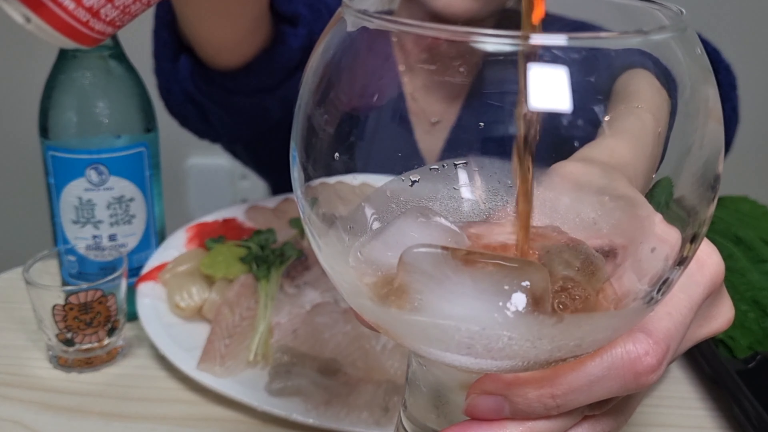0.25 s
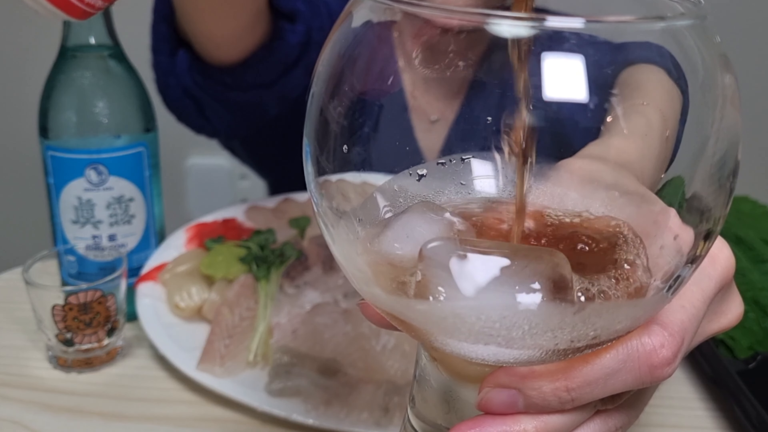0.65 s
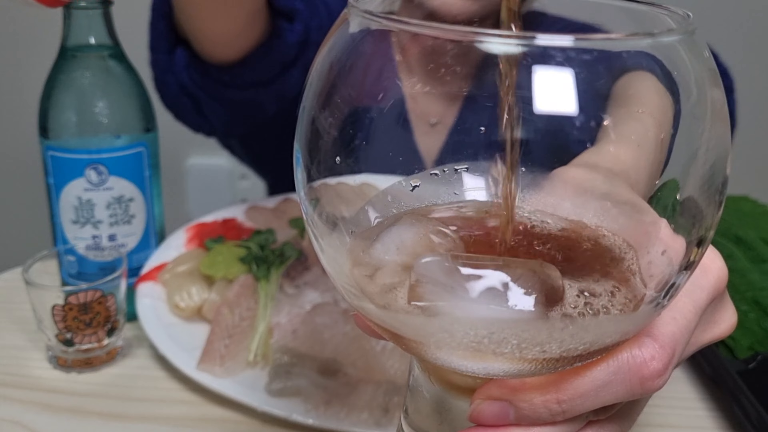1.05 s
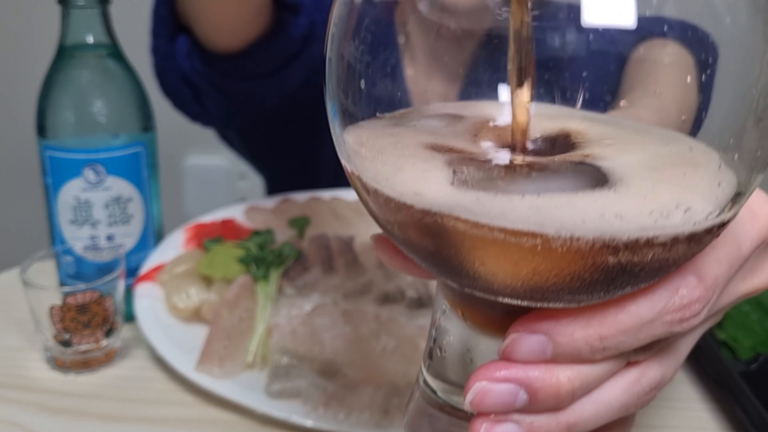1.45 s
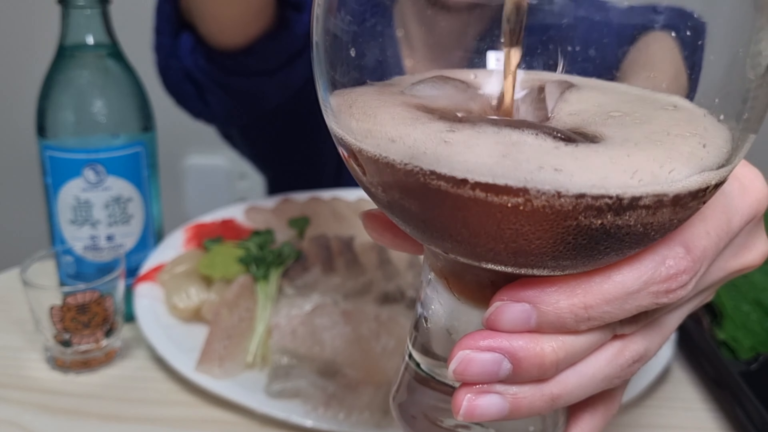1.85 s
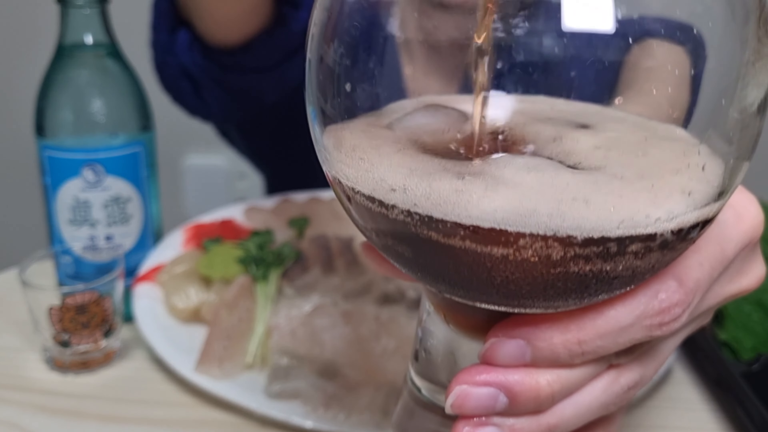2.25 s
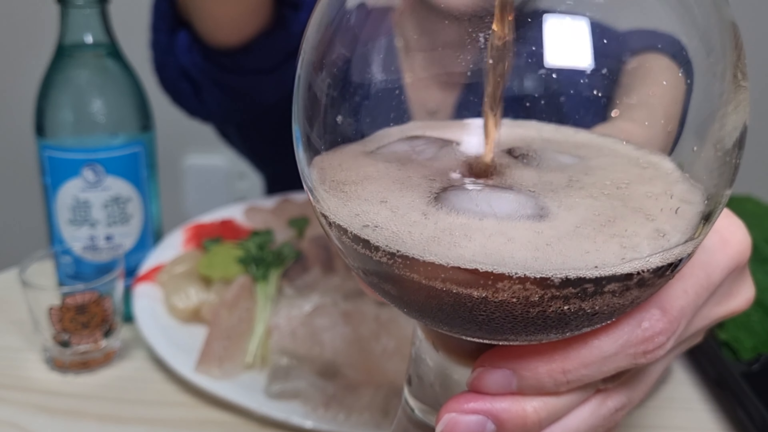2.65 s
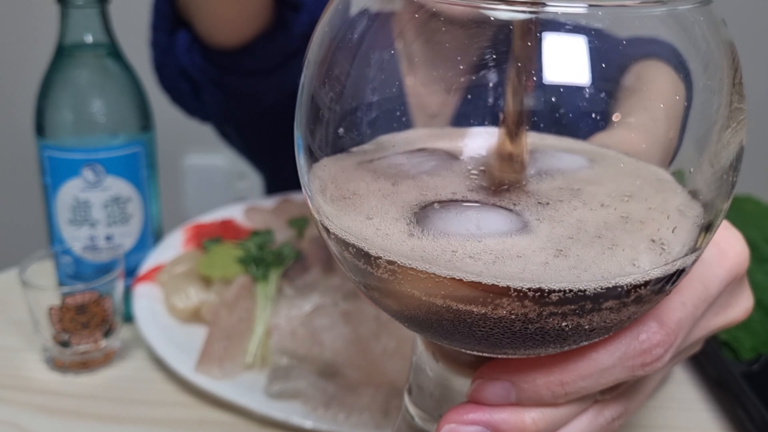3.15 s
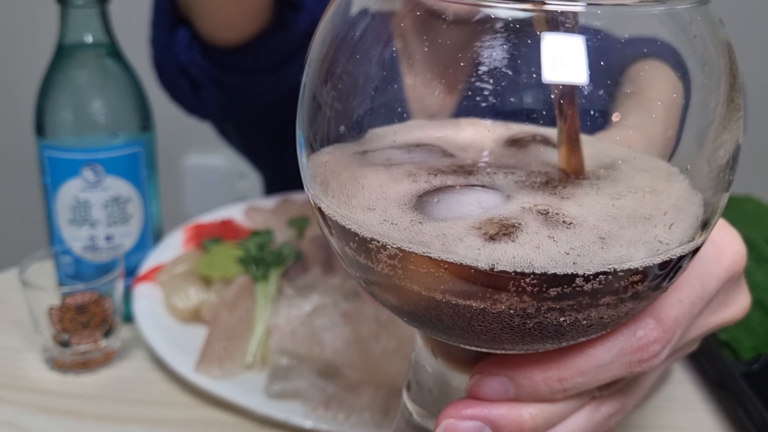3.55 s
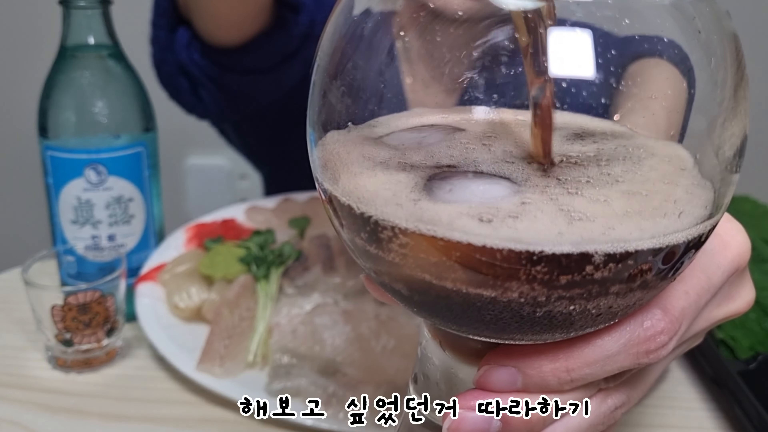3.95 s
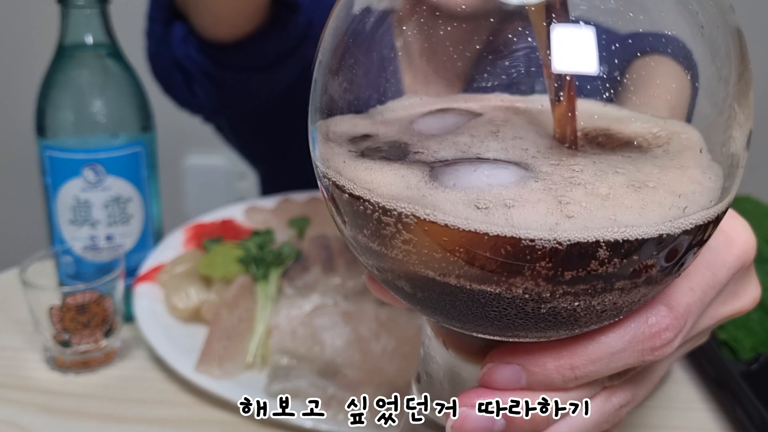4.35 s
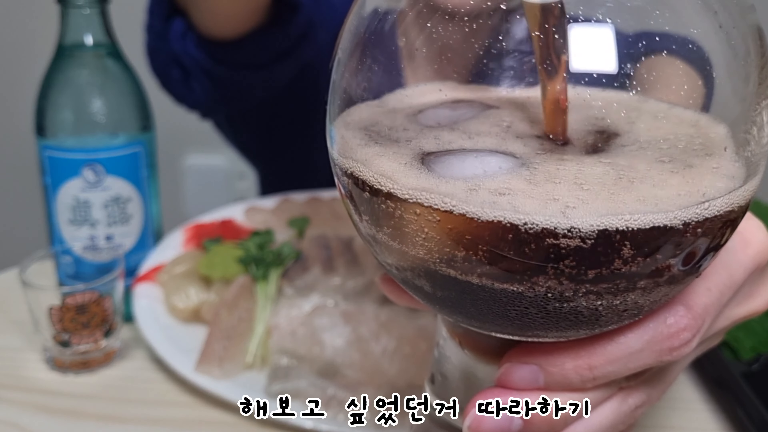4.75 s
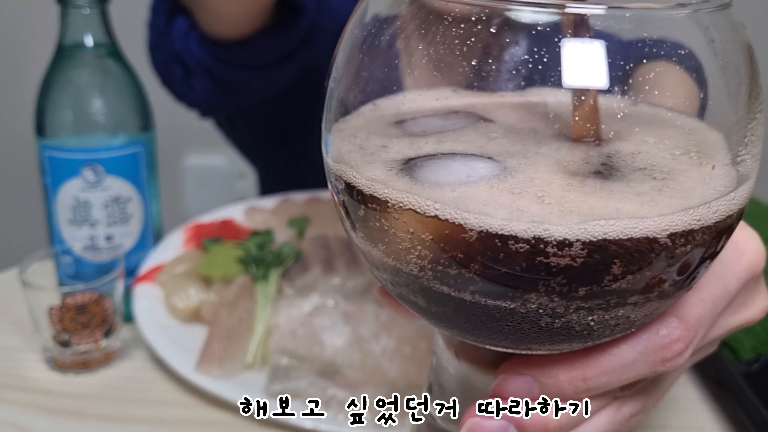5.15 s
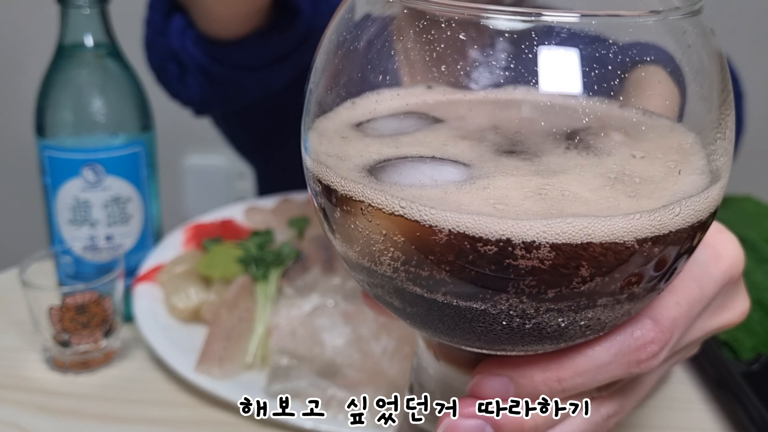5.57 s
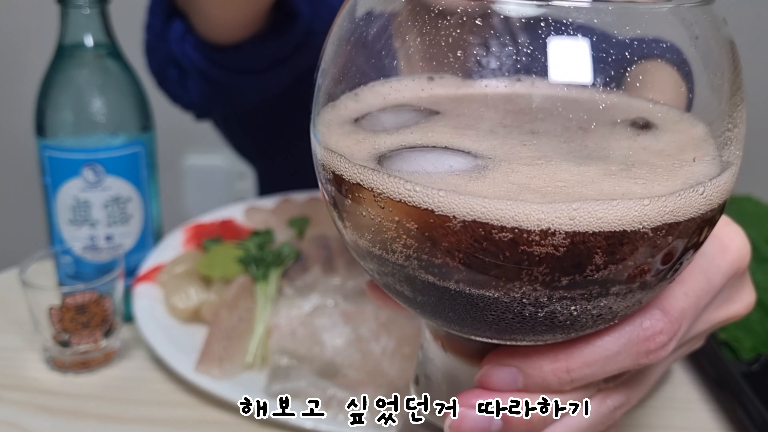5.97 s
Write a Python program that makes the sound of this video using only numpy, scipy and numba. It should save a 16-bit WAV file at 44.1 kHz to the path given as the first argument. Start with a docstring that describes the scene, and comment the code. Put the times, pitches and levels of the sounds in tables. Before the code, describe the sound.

Close, bright fizz and ice clinks as soda fills a big glass, with bubbling gulps, hard hollow knocks and a fading foam hiss.

```python
"""Cola is poured over ice in a big round glass, close to a stereo microphone in a quiet room.
First the stream spatters on bare ice, with fizz from swarms of tiny ringing bubbles; then the scene cuts
to a glass topped with foam, whose random pops hiss and set the air of the bowl singing.
Cubes knock as decaying tones with noise ticks, and the drink gurgles as gulps drive its moving resonances.
The pour ends and the foam fizzes on over a low hum and rumble; a limiter ducks the hardest knocks."""
import sys
import numpy as np
from scipy import signal
from scipy.fft import rfft, irfft
from scipy.io import wavfile
from scipy.ndimage import uniform_filter1d, minimum_filter1d
from numba import njit

SR = 44100
rng = np.random.default_rng(int(sys.argv[2]) if len(sys.argv) > 2 else 0)


def inscribe(sig):
    """Save sig as 16-bit PCM at rate SR to the path in sys.argv[1].

    A 1-D sig is mono; a 2-D sig holds one channel per row.
    Samples are clipped to [-1, 1] before scaling.
    """
    pcm = np.round(np.clip(np.atleast_2d(sig).T, -1, 1) * 32767)
    wavfile.write(sys.argv[1], SR, pcm.astype(np.int16))


N = 335907
TIME = np.arange(N) / SR  # s
FOAM_CUT_S, POUR_END_S = 1.335, 5.84  # the scene cuts from bare ice to a foamy glass; the pour ends


def from_db(db):
    """Decibels to gain."""
    return 10 ** (np.asarray(db) / 20)


def rms_one(x):
    """Scale to unit rms."""
    return x / np.sqrt(np.mean(x ** 2) + 1e-20)


def peak_one(x):
    """Scale to unit peak."""
    return x / (np.abs(x).max() + 1e-20)


def in_time(rows):
    """Columns of a curve table at every sample."""
    s, *columns = np.transpose(rows)
    return [np.interp(TIME, s, c) for c in columns]


def at_hz(points, hz):
    """Read a spectrum on a log-frequency axis."""
    f, db = np.transpose(points)
    return np.interp(np.log(hz + 1e-9), np.log(f), db)


def add(out, s, sound):
    """Mix a short sound in at time s."""
    i = max(int(s * SR), 0)
    out[..., i:i + sound.shape[-1]] += sound[..., :N - i]


def ramp(t, start, length):
    """Rise evenly from 0 to 1."""
    return np.clip((t - start) / length, 0, 1)


def swell(s, hold_s, db, rise_db_per_s, fall_db_per_s):
    """Level in dB that rises up to time s, holds and falls."""
    rise_db = rise_db_per_s * np.maximum(s - TIME, 0)
    fall_db = fall_db_per_s * np.maximum(TIME - s - hold_s, 0)
    return db - rise_db - fall_db


def drift(rate):
    """Smooth chance with spread 1, through `rate` random knots per second."""
    knots = rng.standard_normal(4096)
    return rms_one(np.interp(TIME * rate, np.arange(len(knots)), knots))


def resonate(x, hz, width):
    """Two-pole resonance with gain 1 on top."""
    r = np.exp(-np.pi * width / SR)
    numerator = np.array([1, 0, -1]) * (1 - r * r) / 2
    denominator = [1, -2 * r * np.cos(2 * np.pi * hz / SR), r * r]
    return signal.lfilter(numerator, denominator, x + 1e-18)


@njit
def glide(x, turn, keep):
    """Resonance whose pitch (radians per sample) moves."""
    out, state = np.zeros(len(x)), 0j
    for i in range(len(x)):
        state = state * keep * complex(np.cos(turn[i]), np.sin(turn[i])) + x[i]
        out[i] = state.real
    return out


def moving_mode(x, hz, width):
    """Drive a gliding resonance, twice over to keep its skirts narrow; rms 1."""
    turn = 2 * np.pi * hz / SR
    once = glide(x, turn, np.exp(-np.pi * width / SR))
    return rms_one(glide(once, turn, np.exp(-4 * np.pi * width / SR)))


def coloured(x, spectrum):
    """Shape steady sound by a spectrum that falls away below its first point; rms 1."""
    hz = np.fft.rfftfreq(N, 1 / SR)
    gain = from_db(at_hz(spectrum, hz)) * np.minimum(hz / spectrum[0][0], 1) ** 2
    return rms_one(irfft(rfft(x) * gain, N))


def pops(per_s, spread_db):
    """Random clicks, many small and a few large."""
    at = np.flatnonzero(rng.random(N) < per_s / SR)
    size_db = spread_db * np.minimum(rng.exponential(1, len(at)), 4)
    out = np.zeros(N)
    out[at] = from_db(size_db) * rng.choice([-1, 1], len(at))
    return out


def stereo(mid, side, likeness):
    """Two channels with the given correlation."""
    c = np.clip(likeness, -.99, .99)
    return (np.sqrt(1 + c) * mid + np.sqrt(1 - c) * side * np.array([[1], [-1]])) / np.sqrt(2)


def stereo_noise(length, likeness):
    """White noise in two channels."""
    return stereo(*rng.standard_normal((2, length)), likeness)


def panned(x, pan_db):
    """Place a sound by its left-right level."""
    return x * from_db(np.array([[pan_db], [-pan_db]]) / 2)


def decay(t, t60):
    """Gain that falls 60 dB in t60 seconds."""
    return from_db(-60 * t / t60)


def ping(t, hz, t60):
    """A dying sine."""
    return np.sin(2 * np.pi * hz * t) * decay(t, t60)


def onset(t, attack_s):
    """Gain that rises smoothly towards 1."""
    return 1 - np.exp(-t / attack_s)


def swarm(colour, per_s, cycles, spread_db, patchy_db, pan_db, count):
    """Tiny bubbles of many sizes, each ringing for some cycles at its own place; rms 1."""
    out = np.zeros((2, N))
    for hz in np.geomspace(colour[0][0], colour[-1][0], count):
        clicks = pops(per_s / count, spread_db) * from_db(patchy_db * drift(30))
        at = np.flatnonzero(clicks)
        places_db = pan_db * rng.standard_normal(len(at)) * np.array([[1], [-1]])
        both = np.zeros((2, N))
        both[:, at] = clicks[at] * from_db(places_db)
        rung = resonate(resonate(both, hz, 2 * hz / cycles), hz, hz / 2)
        # sqrt(hz): the bands widen with pitch while the colour is a level per Hz
        out += rms_one(rung) * from_db(at_hz(colour, hz)) * np.sqrt(hz)
    return rms_one(out)


def hum():
    """An appliance hums: a low sine, a little unsteady in pitch and level."""
    hz = 94 + 3 * drift(9)
    level_db = -57 + 1.2 * drift(12)  # rms, before panning
    return np.sqrt(2) * np.sin(2 * np.pi * np.cumsum(hz) / SR) * from_db(level_db)


# Faint room rumble at the microphone, relative spectrum: (frequency [Hz], level [dB per Hz])
RUMBLE_COLOUR = [(25, -20), (45, -7), (63, 1.5), (85, 2.5), (125, -9), (200, -19.5), (500, -20),
                 (1500, -20.5)]


def rumble():
    """Low noise, almost unlike on the two sides."""
    return from_db(-54.5) * coloured(stereo_noise(N, 0.091), RUMBLE_COLOUR)


def background():
    """The appliance hum and the rumble, both leaning to the right."""
    return panned(hum() + rumble(), -6.0)


def room(x, t60=0.17, first_s=0.0052, dull_hz=3300):
    """Table and walls return a short, dull scatter of echoes, different on each side."""
    t = TIME[:SR // 3]
    echoes = rng.standard_normal((2, len(t))) * decay(t, t60) * np.clip(t / first_s - 1, 0, 1)
    echoes = echoes / np.sqrt(np.sum(echoes ** 2) / 2)
    echoes = signal.sosfilt(signal.butter(2, dull_hz, fs=SR, output="sos"), echoes)
    return from_db(-12) * signal.fftconvolve(x, echoes, axes=1)[:, :N]


def head_level():
    """The foam swells slightly around the end of the pour, then dies away, in dB."""
    swell_db, swell_s, peak_s, fade_db_per_s = 0.5, 1.3, 6.6, 5.5
    swollen_db = swell_db * ramp(TIME, POUR_END_S - swell_s / 2, swell_s)
    return swollen_db - fade_db_per_s * np.maximum(TIME - peak_s, 0)


# Fine hiss of the foam, relative spectrum: (frequency [Hz], level [dB per Hz])
FOAM_COLOUR = [(800, -61), (1500, 8), (2500, 13), (4000, 6.5), (6000, 4), (8500, 3), (10000, -2),
               (12500, 2), (15500, -0.5)]


def foam_hiss():
    """Countless bursting cells make a fine hiss that barely follows the head."""
    follows = 0.083  # share of the head's swing in dB
    hiss = coloured(stereo(pops(14000, 3.63), pops(14000, 3.98), 0.13), FOAM_COLOUR)
    return from_db(-45 + follows * head_level()) * hiss


# Air in the bowl, pitches before the fill ratio, levels relative:
# (frequency [Hz], width [Hz], level [dB], left-right likeness [-1 to 1, clipped])
BOWL_AIR = [(1033.6, 94, 7, 1), (984, 220, 1, -1.3), (2214, 120, 3.5, 0.82), (3360, 64, -3.5, 0.4)]


def foam_murmur():
    """Larger pops set the air of the bowl singing, rising as the drink narrows the space above it."""
    build_s, fill_rise, fill_rise_s = 0.3, 0.035, 2.15
    built = 1 - 0.78 * np.exp(-np.maximum(TIME - FOAM_CUT_S, 0) / build_s)
    ratio = 0.9725 + fill_rise * ramp(TIME, POUR_END_S - fill_rise_s, fill_rise_s)
    mid, side = pops(3500, 6.8), pops(3500, 1.8)
    air = 0
    for hz, width, db, alike in BOWL_AIR:
        pitch = hz * ratio
        mode = stereo(moving_mode(mid, pitch, width), moving_mode(side, pitch, width), alike)
        air = air + from_db(db) * mode
    return built * from_db(-42.5 + head_level()) * rms_one(air)


# Coarse crackle of merged cells, relative spectrum: (frequency [Hz], level [dB per Hz])
CRACKLE_COLOUR = [(1150, 6), (1600, -5.5), (2400, -17)]


def foam_crackle():
    """Cells merge as the head ages, so their coarse crackle grows until the pour ends."""
    growth_db_per_s, follows = 15, 1.45  # follows: dB per dB of the head
    crackle = swarm(CRACKLE_COLOUR, per_s=900, cycles=18, spread_db=2.6, patchy_db=1.5, pan_db=5, count=9)
    level_db = -46 + follows * head_level() - growth_db_per_s * np.maximum(POUR_END_S - TIME, 0)
    return from_db(level_db) * crackle


def foam():
    """The head of foam: hiss, singing air and crackle."""
    return foam_hiss() + foam_murmur() + foam_crackle()


# Lowest resonance of the bubbly drink, sinking as it takes up gas, springing back as the gas leaves:
# (time [s], frequency [Hz])
DRINK_PITCH = [(.3, 598), (1.9, 494), (2.3, 559), (2.38, 671), (2.53, 776), (2.67, 563), (2.89, 415),
               (3.22, 328), (3.55, 374), (4.4, 394.6), (5.44, 462), (5.8, 722)]


def drink_pitches():
    """The two resonances of the drink move together, in Hz."""
    first_hz, = in_time(DRINK_PITCH)
    return first_hz, 1.25 * first_hz + 229.6


# Ice knocking in the glass, peaks before the trims in knocks() and hard_blows():
# (time [s], peak level [dB], tick level relative to the peak [dB], thud frequency [Hz])
KNOCKS = [(0.287, -5, -28, 800), (0.432, -23, 11, 884), (1.491, -34.5, 19, 956), (1.52, -37.5, 19, 1066),
          (1.633, -21.5, -6, 897), (1.779, -28.5, -16, 970), (1.884, -20.5, -21, 890),
          (1.899, -13, 4.5, 950), (1.987, -21.5, -1.5, 936), (2.197, -15.5, 0.5, 1010),
          (2.275, -11.5, -22, 920), (2.31, -11.5, 2, 1004), (2.374, -13, -11, 976), (2.384, -10, -2, 932),
          (2.407, -13, 5, 953), (2.629, -16.5, 1, 1000), (2.652, -22.5, 12, 1130), (2.693, -12.5, -21, 985),
          (2.81, -16, 1.5, 917), (2.882, -16.5, -5, 910), (3.09, -21.5, 6, 1027), (3.9038, 6, -3.5, 990),
          (4.315, -10, -20, 1017), (4.373, -18, -22, 1018), (4.397, -3, -5, 1074),
          (4.442, -16.5, -10, 1028), (4.588, -12.5, -7, 1024), (5.4288, 6, -1, 1032),
          (5.465, -18, -20, 1005)]


def hard_blows():
    """Knocks shove the glass and crack the ice: the thump grows faster than the knock, the crack slower."""
    thump_hz, thump_t60, thump_db, thump_growth = 192, 0.0083, -35, 2.76  # growth: dB per dB of knock
    crack_hz, crack_t60, crack_db, crack_growth = 3400, 0.0039, -20, 0.72
    out, t = np.zeros((2, N)), TIME[:SR // 8]
    for s, db, *_ in KNOCKS:
        burst = rng.standard_normal((2, len(t))) * decay(t, crack_t60)
        crack = peak_one(resonate(burst, crack_hz, crack_hz))
        thump = ping(t, thump_hz, thump_t60)
        blow = from_db(thump_db + thump_growth * db) * thump + from_db(crack_db + crack_growth * db) * crack
        add(out, s, blow)
    return out


def knock_tick(t):
    """The sharp contact of cube and wall, a very short resonant noise."""
    tick = resonate(rng.standard_normal(len(t)) * decay(t, 0.0081), 1550, 730)
    return peak_one(resonate(tick, 1900, 2700))


def knock_wash(t):
    """Liquid washes round the cube: a dull burst of noise."""
    wash = stereo_noise(len(t), 0.084) * decay(t, 0.064)
    return peak_one(resonate(resonate(wash, 660, 340), 660, 1400))


def knock_sway(t):
    """Air swaying across the bowl reaches the two sides in opposite phase."""
    return ping(t, 1190, 0.091) * onset(t, 0.0024) * np.array([[1], [-1]])


# Ringing of the glass and the air in it, relative levels, lengths before hard knocks shorten them:
# (frequency [Hz], level [dB], decay t60 [s])
GLASS_MODES = [(968, -18, 0.17), (1082, -6, 0.076), (1450, -2, 0.022), (1683, -4.5, 0.016),
               (2220, -21, 0.1), (2860, -7.5, 0.022), (4380, -29, 0.46)]


def knock_ring(t, length, drink_hz):
    """Glass and drink ring on, every mode struck a little differently."""
    modes = [(hz, db - 3, t60 * length) for hz, db, t60 in GLASS_MODES]
    modes += [(hz, db, 0.11) for hz, db in zip(drink_hz, (-22, -23))]
    ring = sum(from_db(db + rng.normal(0, 1)) * ping(t, hz, t60) for hz, db, t60 in modes)
    return ring * onset(t, 0.0045)


def knocks():
    """A cube meets the wall: a tick, a hollow thud that builds in the bowl, then ringing and wash."""
    hard_from_db, hard_shortens = -14, 0.45  # above this level: dB of length lost per dB
    out, t = np.zeros((2, N)), TIME[:SR // 4]
    first_hz, second_hz = drink_pitches()
    for s, db, tick_db, thud_hz in KNOCKS:
        now = int(s * SR)
        length = from_db(-hard_shortens * max(db - hard_from_db, 0))
        thud = peak_one(ping(t, thud_hz, 0.026 * length) * onset(t, 0.0042 * length) ** 2)
        ring = knock_ring(t, length, (first_hz[now], second_hz[now]))
        sound = peak_one(thud + ring) + from_db(-15) * knock_sway(t)
        sound = sound + from_db(tick_db - 6) * knock_tick(t) + from_db(-13) * knock_wash(t)
        add(out, s, from_db(db + 1) * sound)
    # so small a body radiates little bass
    return signal.sosfilt(signal.butter(4, 310, "high", fs=SR, output="sos"), out + 1e-18)


# Single short rings and chirps: bubbles, bowl rings near 2.3 kHz and one high ping; peaks before a 1 dB cut:
# (time [s], peak level [dB], starting frequency [Hz], decay t60 [s], glide [octaves per s])
RINGS_AND_CHIRPS = [(0.106, -24, 2315, 0.1, -0.7), (0.16, -28.5, 1263, 0.012, 6),
                    (0.299, -13, 900, 0.016, 20), (0.313, -20, 848, 0.12, -8),
                    (0.378, -15, 2400, 0.018, 35), (1.078, -26, 2290, 0.019, -3),
                    (1.65, -44, 423, 0.1, -3.5), (2.7, -20.5, 960, 0.15, -3), (2.885, -36, 400, 0.3, -.8),
                    (4.587, -15.5, 5360, 0.016, 0)]


def rings_and_chirps():
    """Single bubbles, bowl rings and a high ping: short decaying sines, some gliding up or down."""
    out, t = np.zeros((2, N)), TIME[:SR // 3]
    for s, db, hz, t60, octaves_per_s in RINGS_AND_CHIRPS:
        pitch = hz * 2 ** np.clip(octaves_per_s * t, -.5, .5)
        sound = np.sin(2 * np.pi * np.cumsum(pitch) / SR) * decay(t, t60) * onset(t, 0.002) ** 2
        add(out, s, from_db(db - 1) * peak_one(sound))
    return out


# Soft round plops as air is gulped under, and the last drips: (time [s], peak level [dB], frequency [Hz])
PLOPS = [(2.231, -26, 950), (2.352, -23, 930), (2.46, -11, 740), (2.51, -19.5, 789), (2.536, -16, 799),
         (2.555, -20, 800), (2.786, -24.5, 914), (2.923, -23.5, 805), (2.97, -25.5, 757), (2.994, -24, 750),
         (3.044, -25.5, 810), (3.251, -40, 300), (5.818, -16.5, 973), (5.885, -25, 954),
         (5.961, -26.5, 951)]


def plops():
    """A pocket of air closes without a click: a short round tone, then bowl and drink ringing on."""
    t60, drink_t60 = 0.033, 0.17  # s
    out, t = np.zeros((2, N)), TIME[:SR // 4]
    first_hz, _ = drink_pitches()
    rise = onset(t, 0.0034) ** 2
    for s, db, hz in PLOPS:
        tone = ping(t, hz, t60) + from_db(-9) * ping(t, BOWL_AIR[0][0], t60)
        tail = from_db(-14) * ping(t, first_hz[int(s * SR)], drink_t60)
        add(out, s, from_db(db) * peak_one(peak_one(tone * rise) + tail * rise))
    return out


# The stream plunges into the drink and churns it:
# (time [s], hold [s], level [dB], fall [dB per s])
PLUNGES = [(0.302, 0.22, -41, 448), (2.386, 0.056, -24, 51), (2.943, 0.074, -42, 97), (3.24, 0.82, -57, 43)]


def churn():
    """How hard the stream stirs the drink, in dB."""
    return np.max([swell(s, hold_s, db, 325.5, fall) for s, hold_s, db, fall in PLUNGES], axis=0)


# Short-lived bubbles in the churned drink, relative spectrum: (frequency [Hz], level [dB per Hz])
SLOSH_COLOUR = [(560, 7.5), (1000, 9), (1400, 11), (2000, 0.5), (3400, -1)]


def slosh(foamy):
    """Churning traps short-lived bubbles; a head of foam muffles the small ones."""
    bare_db, under_foam_db, muffle_hz = 4, -7, 1100
    plips = swarm(SLOSH_COLOUR, per_s=620, cycles=13, spread_db=3.0, patchy_db=1.5, pan_db=4, count=12)
    muffled = signal.sosfilt(signal.butter(3, muffle_hz, fs=SR, output="sos"), plips)
    bare_part = (1 - foamy) * from_db(bare_db) * plips
    foamy_part = foamy * from_db(under_foam_db) * muffled
    return from_db(churn()) * (bare_part + foamy_part)


def evened(x, size=900):
    """Soften the fading of a ringing tone, so that one gulp runs on into the next; rms 1."""
    return rms_one(x / np.sqrt(uniform_filter1d(x ** 2, size=size) + 1))


def ringing_drink():
    """Gulps of air ring the bubbly drink, its pitches wavering and its higher ones held back by the bowl."""
    pass_hz, cut_db_per_octave, waver = 870, 51, 0.024
    gulps = pops(110, 2.0) * from_db(4 * drift(22))
    drink = 0
    for hz, width, db in zip(drink_pitches(), (34, 55), (-6.5, 3)):
        passed_db = -cut_db_per_octave * np.maximum(np.log2(hz / pass_hz), 0)
        tone = evened(moving_mode(gulps, hz * (1 + waver * drift(40)), width))
        drink = drink + from_db(db + passed_db) * tone
    return drink


# Fizz of tiny gas bubbles, relative spectrum: (frequency [Hz], level [dB per Hz])
FIZZ_COLOUR = [(4500, -5), (5600, 1.5), (7000, 0), (8400, 4), (9500, -9), (11000, -2), (12500, 0),
               (15500, 1)]


def gulp_spray():
    """Bursts of spray outgrow the churning and follow the drink's low resonance in pitch, up and down."""
    growth, full_db = 0.11, -7  # extra dB per dB of churning, and the churning at full spray
    first_hz, _ = drink_pitches()
    spray_hz = first_hz * 11.5 * (1 + .1 * drift(25))
    spray = np.array([moving_mode(pops(2500, 4.2), spray_hz, 1200) for side in range(2)])
    mist = from_db(-3) * coloured(stereo(pops(3100, 2.4), pops(4000, 5.3), 0.32), FIZZ_COLOUR)
    burst_db = -16 + growth * (churn() - full_db) + 4.5 * drift(35.64)
    return from_db(burst_db) * (spray + mist)


def gurgle():
    """Gulps of air under the stream ring the drink and throw up spray; both follow the churning."""
    return from_db(churn()) * (ringing_drink() + gulp_spray())


# Short bright spurts of fizz on the ice, and later of spray in the gurgle, peaks before a 6 dB lift:
# (time [s], peak level [dB], centre frequency [Hz])
SPURTS = [(0.599, -16, 12350), (0.6156, -25, 5520), (0.737, -21.5, 9900), (0.761, -22, 8200),
          (0.8293, -21.5, 11100), (0.8317, -27, 4320), (0.902, -27, 3640), (0.9264, -24.5, 5470),
          (0.9469, -21, 5460), (0.958, -19, 12800), (0.9903, -18, 12800), (1.0, -21, 3370),
          (1.035, -28, 6360), (1.139, -25, 9700), (1.228, -22, 11500), (1.25, -22.5, 6750),
          (1.2854, -18, 11500), (1.32, -23.5, 9400), (2.478, -25, 8800), (2.674, -36, 6560),
          (2.731, -28.5, 6630), (2.795, -32.5, 6600), (3.047, -33.5, 10800)]


def spurts():
    """Each spurt is a crowd of tiny bubbles bursting within a few milliseconds, as fading noise."""
    out, t = np.zeros((2, N)), TIME[:SR // 12]
    treble = signal.butter(4, 2600, "high", fs=SR, output="sos")
    fade = decay(t, 0.016) + from_db(-15) * decay(t, 0.09)  # the burst and a fainter, longer tail
    for s, db, hz in SPURTS:
        crowd = stereo_noise(len(t), 0.13) * onset(t, 0.0002) * fade
        sound = resonate(crowd, hz, hz / 6) + from_db(-14) * resonate(crowd, hz, hz)
        add(out, s, from_db(db + 6) * peak_one(signal.sosfilt(treble, sound)))
    return out


# Modes of the nearly empty bowl under the drops, relative levels: (frequency [Hz], level [dB])
SPATTER_MODES = [(2270, -1), (2950, -4), (3550, 1), (4300, -7), (5520, -9.5)]


def spatter():
    """Drops on the ice ring the nearly empty bowl, each drop striking the modes differently; rms 1."""
    mode_spread_db, patchy_db, cycles = 4.0, 5, 17
    drops = pops(1000, 3.0)
    at, out = np.flatnonzero(drops), 0
    for hz, db in SPATTER_MODES:
        both = np.zeros((2, N))
        # which modes speak changes as the stream wanders over the cubes
        strength_db = mode_spread_db * rng.standard_normal((2, len(at))) + patchy_db * drift(28)[at]
        both[:, at] = drops[at] * from_db(strength_db) * rng.choice([-1, 1], (2, len(at)))
        rung = resonate(resonate(both, hz, hz / cycles), hz, hz / 5)
        out = out + from_db(db) * rms_one(rung)
    return rms_one(out)


# The stream falters, sagging ever lower until it lands again: (landing time [s], length [s])
LULLS = [(0.094, 0.1), (0.597, 0.034), (0.82, 0.058), (1, 0.019), (1.232, 0.038), (1.276, 0.018)]
# The stream slaps a cube, each time with the same swell and fall: (time [s], level [dB])
SLAPS = [(.15, -36.5), (.27, -30), (.68, -43), (.93, -38), (1.29, -46)]


def stream_on_ice():
    """The stream splashes on bare cubes and its gas breaks out in clumps of bright fizz."""
    sag_db_per_s, slap_hold_s, slap_rise, slap_fall = 225, 0.043, 77.5, 49.5  # rise and fall in dB per s
    sagging_s = sum(np.maximum(TIME - s + length, 0) * (TIME < s) for s, length in LULLS)
    clumps_db = 3.5 * drift(49.95)
    # fizz grows steadily as more drink wets the cubes
    fizz_db = -39 + 5 * TIME
    fizz = swarm(FIZZ_COLOUR, per_s=5500, cycles=81, spread_db=2.0, patchy_db=-0.5, pan_db=6.0, count=18)
    splash_db = np.max([swell(s, slap_hold_s, db, slap_rise, slap_fall) for s, db in SLAPS], axis=0)
    landed = TIME > LULLS[0][0]  # no splash before the stream first lands
    splash = landed * from_db(splash_db) * spatter()
    return from_db(clumps_db - sag_db_per_s * sagging_s) * (from_db(fizz_db) * fizz + splash)


def scene():
    """Bare ice before the cut, foam after it; the glass stands a little left of the close microphone."""
    foamy = ramp(TIME, FOAM_CUT_S, 0.0021)
    glass = (1 - foamy) * stream_on_ice() + foamy * (foam() + gurgle())
    glass = glass + spurts() + slosh(foamy) + rings_and_chirps() + plops() + knocks() + hard_blows()
    left_lead_s = 8e-5  # the sound reaches the left side first
    glass = np.array([glass[0], np.roll(glass[1], round(left_lead_s * SR))])
    return glass + room(glass) + background()


def record(dry):
    """A fast limiter with a slow release and a limited range; what is left over clips, then the top is cut."""
    range_db, release_db_per_s, cutoff_hz = 6, 20, 15600
    over_db = np.clip(20 * np.log10(np.abs(dry).max(axis=0) + 1e-9), 0, range_db)
    release_db = release_db_per_s * TIME
    held_db = np.maximum.accumulate(over_db + release_db) - release_db
    # the gain starts down just ahead of each peak
    gain_db = uniform_filter1d(minimum_filter1d(-held_db, size=45), size=45)
    limited = np.clip(dry * from_db(gain_db), -1, 1)
    return signal.sosfilt(signal.ellip(10, .1, 80, cutoff_hz, fs=SR, output="sos"), limited)


dry = scene()
out = record(dry)
inscribe(out)
```